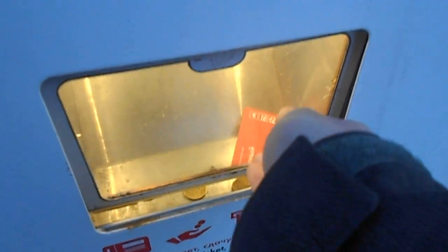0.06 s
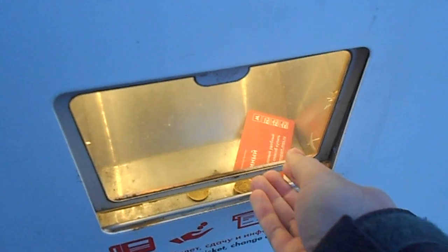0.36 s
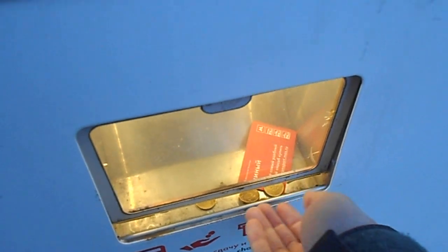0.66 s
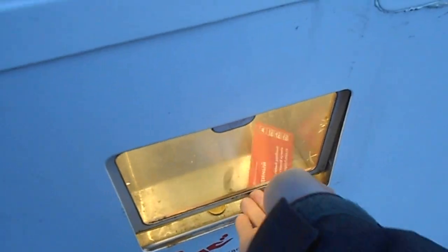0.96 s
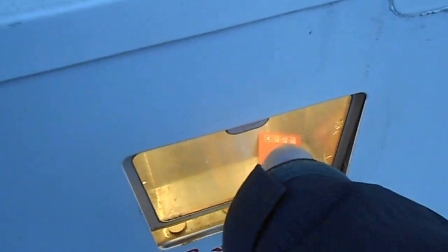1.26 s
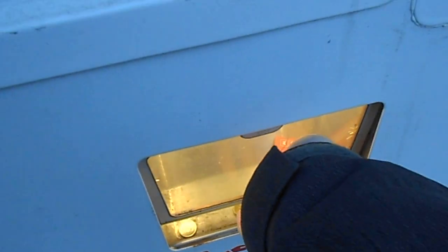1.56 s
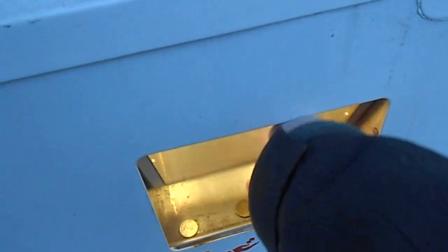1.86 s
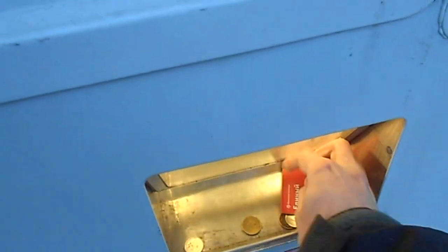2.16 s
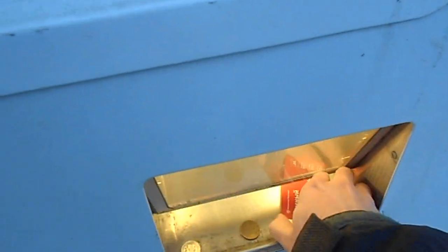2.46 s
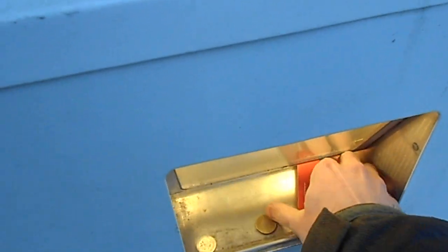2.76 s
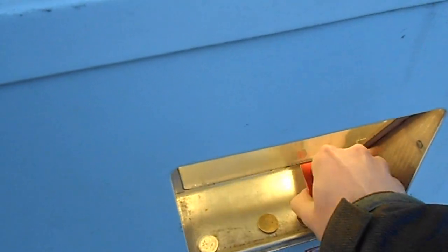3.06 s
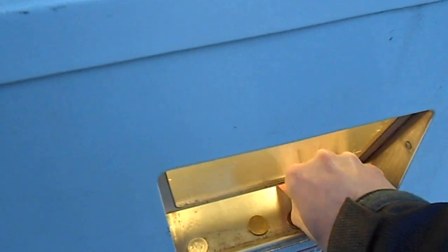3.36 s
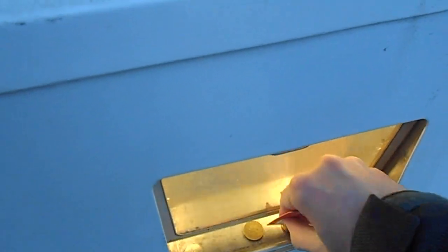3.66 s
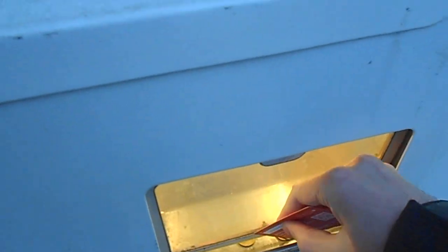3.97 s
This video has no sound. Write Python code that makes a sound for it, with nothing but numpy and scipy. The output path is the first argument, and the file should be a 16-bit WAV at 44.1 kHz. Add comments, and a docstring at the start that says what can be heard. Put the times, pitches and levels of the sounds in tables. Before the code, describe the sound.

Coins rattle into a metal tray, then a hand scrapes them up over distant traffic.

```python
"""At an outdoor ticket machine, one microphone close by, the road a long way off.
Change rattles down the steel chute and lands in the metal tray; each strike rings the steel it hits.
A hand knocks the flap open, which gives thin stick-slip squeaks, and scrapes the coins over the tray.
Distant traffic rumbles and swells behind it all, with a faint, narrow hiss high in the treble."""
import sys
import numpy as np
from scipy import signal
from scipy.fft import rfft, irfft
from scipy.io import wavfile

SR = 44100
rng = np.random.default_rng(int(sys.argv[2]) if len(sys.argv) > 2 else 0)


def put_to_file(sound):
    """Save the sound as 16-bit audio at rate SR, in the file named by the first command-line argument."""
    columns = np.atleast_2d(sound).T  # one column per channel
    safe = np.clip(columns, -1, 1)
    whole_steps = np.round(safe * 32767)
    wavfile.write(sys.argv[1], SR, whole_steps.astype(np.int16))


N = 176400

# Coin strikes: high in the chute, low in it, in the tray, under the hand, and a loose coin tipping over.
# Each row: start in seconds, relative level in dB, weight of the body in dB, clatter t60 in seconds.
UPPER_HITS = [(.002, -40.5, -1.5, 0.04), (.056, -60.5, 9, 0.37), (.102, -52, 0, 0.21),
              (.1428, -41, 2, 0.066), (.177, -48, -1, 0.064), (.194, -43.5, 7, 0.12),
              (.358, -19.5, -11, 0.082), (.42, -42, -19, 0.079), (.4375, -19.5, -10.5, 0.056),
              (.496, -42, -12, 0.15), (.5135, -20.5, -11.5, 0.074)]
LOWER_HITS = [(0.5732, -12, -17.5, 0.063), (0.6546, -24.5, -6, 0.18), (0.7157, -38, -3, 0.25),
              (0.734, -23, -7.5, 0.099), (0.8104, -26, -9.5, 0.1), (0.855, -34.5, 2, 0.31)]
TRAY_HITS = [(.8895, -21, -8.5, 0.091), (.9292, -31, -12, 0.16), (.9607, -24.5, -11.5, 0.12),
             (.9895, -22.5, -5.5, 0.12), (1.0453, -18, -8, 0.034), (1.0802, -22, -12, 0.069),
             (1.1148, -26.5, -15, 0.056), (1.1794, -34.5, -7.5, 0.063), (1.2078, -27, -5, 0.038),
             (1.2293, -31.5, -5, 0.11), (1.245, -27.5, -6.5, 0.083), (1.278, -39.5, -3, 0.068),
             (1.3363, -34, -8, 0.038), (1.3582, -23.5, -10, 0.068), (1.4157, -46, -21, 0.096),
             (1.4347, -25.5, -7, 0.071), (1.452, -36.5, -16, 0.034), (1.5053, -32, -9.5, 0.056)]
HAND_HITS = [(2.0548, -43.5, 5, 0.023), (2.3501, -50, -13, 0.024), (2.4079, -47.5, -30, 0.023),
             (2.5351, -32.5, 6, 0.088), (2.573, -35.5, -16, 0.054), (2.888, -48, 7, .11),
             (2.9377, -36.5, 2, 0.055), (3.2074, -42, 44, 0.083), (3.2954, -26.5, -29, 0.055),
             (3.3078, -40, 8, 0.079), (3.3418, -33, -4, 0.097), (3.3561, -25.5, -22.5, 0.072),
             (3.4307, -27.5, -5, 0.11), (3.4443, -21.5, -13, 0.043), (3.492, -36, -28, 0.021),
             (3.733, -42, 1, 0.067), (3.7883, -41, -3, 0.024), (3.9834, -41.5, -26, 0.055)]
LOOSE_HITS = [(1.949, -43, 7, .07), (2.56, -38, -4, .1), (2.669, -37, 6.5, 0.07)]
# What those strikes ring. Each row: frequency in Hz, relative level in dB.
UPPER_MODES = [(2510, -5), (3020, -8), (4080, -1), (4790, -1), (5000, -0.5), (6950, 0.5), (7300, -6),
               (7800, -7), (8020, -3.5), (8380, -8), (8660, 1.5)]
LOWER_MODES = [(3420, -7.5), (4370, 0), (4560, -5.5), (5250, -6), (5835, -4.5), (6710, -6.5), (7345, -5.5),
               (8400, -7), (8905, 2.5), (9280, -14.5), (10400, -13.5)]
TRAY_MODES = [(3380, 1.5), (3780, -1.5), (4380, 0), (4940, 0.5), (5330, -4), (5690, -5.5), (6970, 1),
              (7310, 0.5), (7700, -4), (8520, 3.5), (8900, 4.5), (9700, -3)]
HAND_MODES = [(2203, 2.5), (2720, 1.5), (3050, 6.5), (3310, 7), (4160, 5), (5040, -9.5), (6700, -1),
              (7980, -3.5)]
LOOSE_MODES = [(4450, -4.5), (7343, -7)]
# Spectrum of the steel box's dense clatter. Each row: frequency in Hz, relative level in dB.
CLATTER_COLOUR = [(200, -2), (700, -6.5), (1700, -5.5), (2500, -2), (4200, 4), (6000, -2.5), (8500, 0.5),
                  (10200, -4), (12500, -2.5)]
# Heavy landings in the tray. Each row: start in seconds, sheet ring level in dB, thud level in dB.
LANDINGS = [(0.886, -42, -53), (.962, -47, -40.5), (1.08, -50, -49), (1.235, -50.5, -52),
            (1.358, -63.5, -63)]
# Dull knocks on the flap. Each row: start in seconds, level in dB.
KNOCKS = [(1.941, -27.5), (2.305, -30), (3.209, -33.5)]
# The tray's sheet, its thud, and the flap. Each row: frequency in Hz, relative level in dB, t60 in seconds.
SHEET_MODES = [(747, -3.5, 0.24), (1105, 6, 0.39), (1683, -10, 0.36), (2060, 0.5, 0.17), (2470, -3, 0.2),
               (3600, 5.5, 0.17), (3600, 0, 0.21)]
THUD_MODES = [(421, -0.22, 0.12), (441.4, -1, 0.26)]
FLAP_MODES = [(243.6, -4, 0.14), (534, 0.5, 0.047), (694, -2, 0.036), (1290, 0.5, 0.028)]
# Flap squeaks, one curve each. Each point: time in seconds, pitch in Hz, relative level in dB.
SQUEAK_CURVES = [
    [(1.975, 7900, -42), (1.997, 7360, -33), (2.029, 7250, -38.5), (2.048, 7360, -61)],
    [(2.486, 8000, -44), (2.494, 7910, -37), (2.519, 7930, -32.5), (2.538, 7900, -50)],
    [(2.775, 7366, -38), (2.811, 7455, -36.5), (2.847, 7580, -68)],
    [(3.716, 5120, -48.5), (3.82, 4990, -35.5), (3.878, 4700, -54.5)],
    [(3.926, 4900, -60), (3.956, 4940, -34), (3.982, 4900, -52)],
]
# Fingers and ticket rubbing on the steel. Each row: time in seconds, level in dB.
RUB_LEVELS = [(1.801, -82), (2.45, -67), (2.7, -57.5), (3.1, -59.5), (3.25, -50), (3.481, -45.5),
              (3.6, -67), (4, -63)]
# Swells from the road. Each row: time in seconds, then relative bass, low-mid and mid levels in dB.
TRAFFIC_LEVELS = [(0, -58, -66, -69.5), (.1, -58.5, -61.5, -67.5), (.3, -44.5, -44, -52.5),
                  (.6, -49.5, -51, -56.5), (.85, -49, -54, -62.5), (1.52, -52.5, -59, -66.5),
                  (1.9, -43, -42.5, -49.5), (2.35, -42, -43, -46.5), (2.9, -45.5, -35.5, -42),
                  (3.35, -39.5, -37.5, -43), (3.6, -44.5, -39, -47.5), (4, -43, -37.5, -43)]
# The road's spectrum from this distance. Each row: frequency in Hz, relative level in dB.
TRAFFIC_COLOUR = [(15, -25), (35, 5.5), (48, 10.5), (75, 4.5), (110, 5), (145, 7), (175, 4), (215, 3),
                  (300, -7), (620, -12), (830, -9), (1400, -12.5), (1900, -27), (3000, -35.5), (6000, -42),
                  (10000, -43.5), (12500, -48)]
# The microphone's response. Each row: frequency in Hz, gain in dB.
MIC_RESPONSE = [(10, 1), (10200, -1.5), (10900, -16.5), (11700, -20), (12500, -28.5)]

BODY_HZ, BODY_FLAT_DB = 4980, -2  # a strike's body weight shelves the sound below BODY_HZ
MODE_SPREAD_DB, MODE_DETUNE = 3, .003  # scatter from strike to strike
TAIL_DB, TAIL_T60 = -25, 0.13  # faint noisy tail of the box
REBOUND_S, SETTLE_S = (.005, 0.028), (0.013, 0.14)  # ranges of delay after a strike
SQUEAK_ROUGHNESS, CHATTER_HZ, OCTAVE_DB = [1, 0.35, 0.024, 0.061, 0.016], 547, -25.5


def coins(hits, modes, db, clatter_db, rise_s, hold_s, partials_db):
    """Each coin strike clatters and rings the steel, then rebounds and settles in fainter ticks."""
    out, t = np.zeros(N), np.arange(SR // 5) / SR
    hz, mode_db = np.transpose(modes)[:, :, None]
    damping = (hz / BODY_HZ) ** 0.6 / 0.85  # high modes die sooner
    after_hold = np.maximum(t - hold_s, 0)
    attack = np.minimum(t / rise_s, 1)
    for s, hit_db, body_db, t60 in hits:
        body = lambda f: amp((body_db - BODY_FLAT_DB) / (1 + (f / BODY_HZ) ** 4))
        colour = lambda f: amp(read(CLATTER_COLOUR, f)) * body(f)
        spread, detune, phase = rng.standard_normal((3, len(modes), 1))
        gain = amp(mode_db + MODE_SPREAD_DB * spread) * body(hz)
        pitch = hz * (1 + MODE_DETUNE * detune)
        waves = np.sin(2 * np.pi * (pitch * t + phase)) * fade(after_hold * damping, t60)
        ring = (gain * waves).sum(0) / np.sqrt((gain ** 2).sum() / 2)
        clatter = noise(len(t), colour) * (fade(after_hold, t60) + amp(TAIL_DB) * fade(t, TAIL_T60))
        after_ring = amp(partials_db) * box_partials(t, colour)
        strike = amp(hit_db + db) * attack * (ring + amp(clatter_db) * clatter + after_ring)
        add(out, s, strike)
        for delay in rng.uniform(*REBOUND_S, size=2):
            add(out, s + delay, .5 * fade(delay, 2 * t60) * strike * fade(t, t60))
        for delay in rng.uniform(*SETTLE_S, size=4):
            add(out, s + delay, amp(-12) * fade(delay, t60=.45) * strike * fade(t, t60 / 2))
    return out


def box_partials(t, colour, count=80, low_hz=1682, high_hz=10790):
    """The steel box rings on in many inharmonic partials; the high ones die sooner."""
    place, size, phase = rng.random((3, count, 1))
    hz = low_hz + (high_hz - low_hz) * ((np.arange(count)[:, None] + place) / count) ** 1.3
    t60 = 0.24 * (hz / BODY_HZ) ** -0.64
    gain = colour(hz) * size ** 2
    decay = np.exp(np.float32(-np.log(1000) / t60 * t))
    waves = np.sin(np.float32(2 * np.pi * (hz * t + phase))) * decay
    return gain[:, 0] @ waves / np.sqrt((gain ** 2).sum() / 2)


def panel(blows, modes, rise_s, puff_db, puff_t60, puff_hz):
    """Blows ring the modes of the tray or flap, with a short dull puff."""
    out, t = np.zeros(N), np.arange(SR) / SR
    attack = np.minimum(t / rise_s, 1)
    for s, db in blows:
        ring = sum(amp(level) * np.sin(2 * np.pi * hz * t) * fade(t, t60) for hz, level, t60 in modes)
        puff = noise(len(t), lambda f: 1 / (1 + (f / puff_hz) ** 6)) * fade(t, puff_t60)
        add(out, s, amp(db) * attack * (ring + amp(puff_db) * puff))
    return out


def flap_squeaks(db, waver_hz, edge_s):
    """Thin stick-slip tones; a lower tone beats against them as the flap catches and lets go."""
    out = np.zeros(N)
    for curve, roughness in zip(SQUEAK_CURVES, SQUEAK_ROUGHNESS):
        s, hz, level = np.transpose(curve)
        t = np.arange(s[0], s[-1], 1 / SR)
        waver = noise(len(t), lambda f: np.exp(-(f / 150) ** 2))
        pitch = np.interp(t, s, hz) + waver_hz * roughness * waver
        phase = 2 * np.pi * np.cumsum(pitch) / SR
        at_ends = np.linspace(-1, 1, len(t)) ** 4
        chatter = roughness * at_ends * np.sin(phase - 2 * np.pi * CHATTER_HZ * t)
        tone = np.sin(phase) + chatter + amp(OCTAVE_DB) * np.sin(2 * phase)
        to_edge = np.minimum(t - t[0], t[-1] - t)
        taper = np.sin(np.pi / 2 * np.clip(to_edge / edge_s, 0, 1)) ** 2
        add(out, s[0], amp(db + np.interp(t, s, level)) * taper * tone)
    return out


def rubbing(grain_db):
    """Fingers and ticket make a grainy friction hiss, coloured by the steel box."""
    grains = amp(grain_db * noise(N, lambda f: 1 / (1 + (f / 90) ** 2)))
    hiss = unit(grains * noise(N, lambda f: amp(read(CLATTER_COLOUR, f))))
    return hiss * amp(np.interp(np.arange(N) / SR, *np.transpose(RUB_LEVELS)))


def traffic(bass_db, low_mid_db, mid_db):
    """Road noise from far off in three bands, each swelling at its own pace."""
    s, *levels = np.transpose(TRAFFIC_LEVELS)
    bands_hz = [(0, 100), (100, 300), (300, SR)]
    out = np.zeros(N)
    for (lo, hi), level, db in zip(bands_hz, levels, (bass_db, low_mid_db, mid_db)):
        band = noise(N, lambda f: amp(read(TRAFFIC_COLOUR, f)) * (f > lo) * (f <= hi))
        out += band * amp(db + np.interp(np.arange(N) / SR, s, level))
    return out


def whine(db, hz, half_width_hz, fade_in_s):
    """A faint, narrow hiss fades in, high in the treble."""
    onset = np.minimum(np.arange(N) / SR / fade_in_s, 1) ** 2
    return amp(db) * onset * noise(N, lambda f: 1 / (1 + ((f - hz) / half_width_hz) ** 2))


def amp(db):
    """Decibels to gain."""
    return 10 ** (np.asarray(db) / 20)


def unit(x):
    """Scales to rms 1."""
    return x / np.sqrt(np.mean(x ** 2) + 1e-20)


def read(points, hz):
    """Reads a spectrum on a log-frequency axis."""
    f, value = np.transpose(points)
    return np.interp(np.log(hz + 1), np.log(f + 1), value)


def shaped(x, gain):
    """Filters x by a gain given as a function of frequency."""
    return irfft(rfft(x) * gain(np.fft.rfftfreq(len(x), 1 / SR)), len(x))


def noise(size, gain):
    """Coloured noise of rms 1."""
    return unit(shaped(rng.standard_normal(size), gain))


def add(mix, s, sound):
    """Mixes a sound in at s seconds."""
    part = mix[max(round(s * SR), 0):][:len(sound)]
    part += sound[:len(part)]


def fade(t, t60):
    """Exponential decay, 60 dB down after t60 seconds."""
    return np.exp(-np.log(1000) * t / max(t60, .005))


def scene():
    """Chute, tray and hand up close, the street behind, all at one microphone."""
    out = coins(UPPER_HITS, UPPER_MODES, db=-10, clatter_db=-1.5,
                rise_s=0.0013, hold_s=.0035, partials_db=-12)
    out += coins(LOWER_HITS, LOWER_MODES, db=-9.5, clatter_db=-3,
                 rise_s=0.00045, hold_s=0.0045, partials_db=-14)
    out += coins(TRAY_HITS, TRAY_MODES, db=-9.5, clatter_db=0,
                 rise_s=0.00077, hold_s=0.006, partials_db=-11)
    out += coins(HAND_HITS, HAND_MODES, db=-6, clatter_db=4,
                 rise_s=0.0015, hold_s=0.0011, partials_db=-16)
    out += coins(LOOSE_HITS, LOOSE_MODES, db=-6.5, clatter_db=3.5,
                 rise_s=0.0019, hold_s=0.0036, partials_db=-15)
    sheet_blows = [(s, db) for s, db, _ in LANDINGS]
    thud_blows = [(s, db) for s, _, db in LANDINGS]
    out += panel(sheet_blows, SHEET_MODES, rise_s=0.028, puff_db=-30, puff_t60=0.087, puff_hz=1500)
    out += panel(thud_blows, THUD_MODES, rise_s=0.012, puff_db=-21, puff_t60=0.092, puff_hz=900)
    out += panel(KNOCKS, FLAP_MODES, rise_s=0.00071, puff_db=-10, puff_t60=0.084, puff_hz=1330)
    out += flap_squeaks(db=4, waver_hz=40.5, edge_s=0.0067)
    out += traffic(bass_db=-1.5, low_mid_db=-1, mid_db=1)
    out += rubbing(grain_db=3.5)
    out += whine(db=-75, hz=7880, half_width_hz=130, fade_in_s=2.6)
    return out[None]


def record(dry):
    """The microphone dulls the top, and a steep low-pass ends the band."""
    coloured = shaped(dry[0], lambda f: amp(read(MIC_RESPONSE, f)))
    low_pass = signal.firwin(511, cutoff=12694, window=("kaiser", 9), fs=SR)
    return signal.oaconvolve(coloured, low_pass, "same")[None]


dry = scene()
out = record(dry)
put_to_file(out)
```